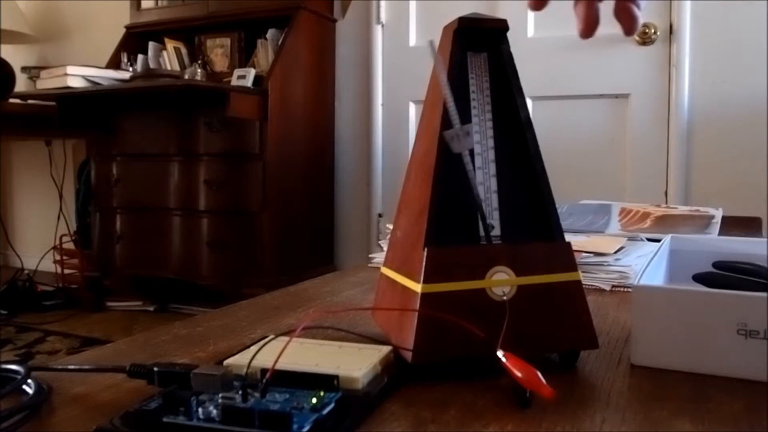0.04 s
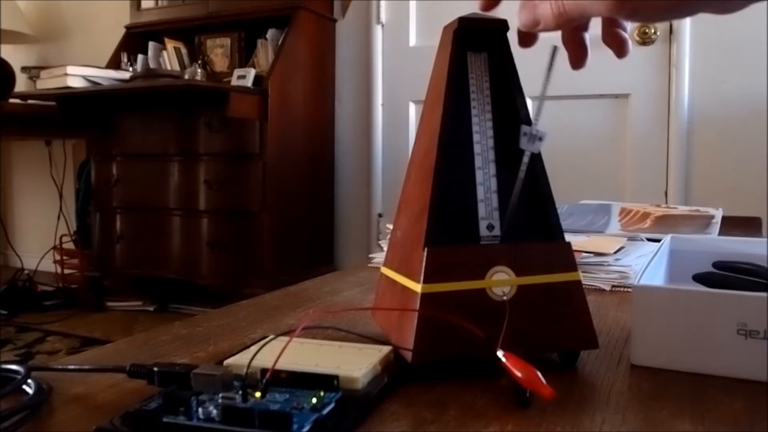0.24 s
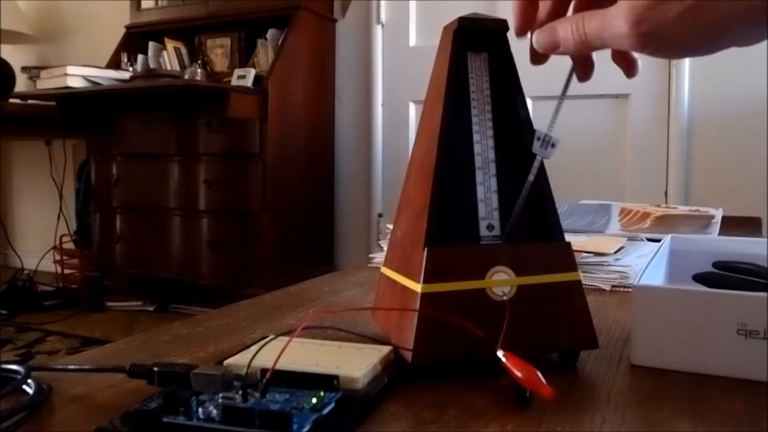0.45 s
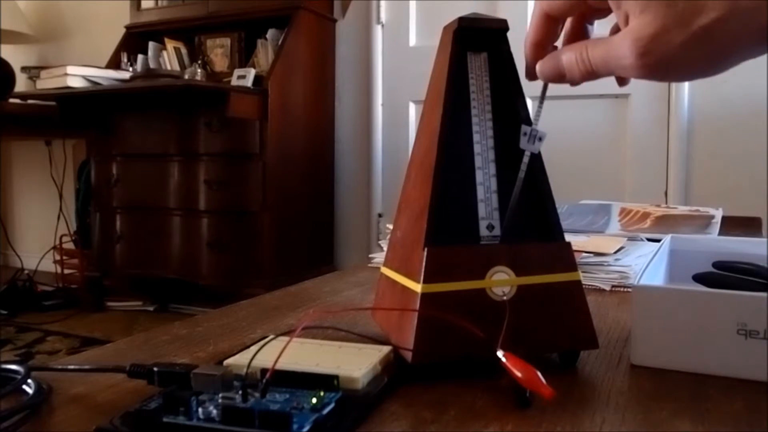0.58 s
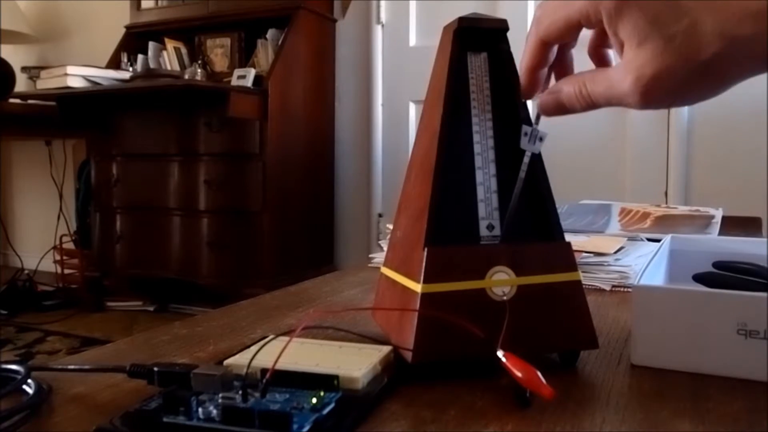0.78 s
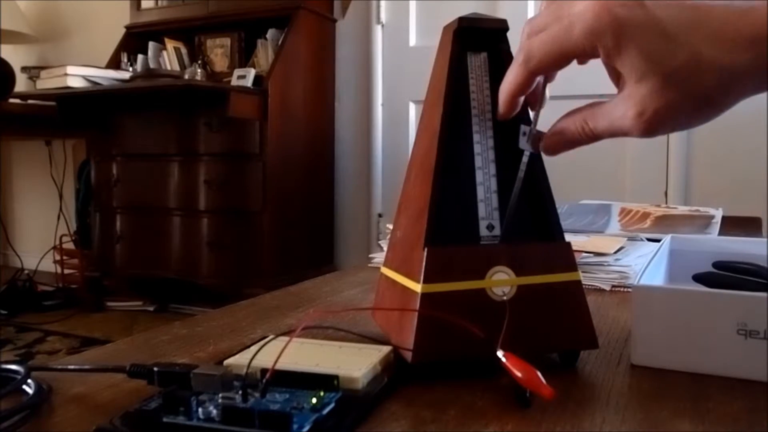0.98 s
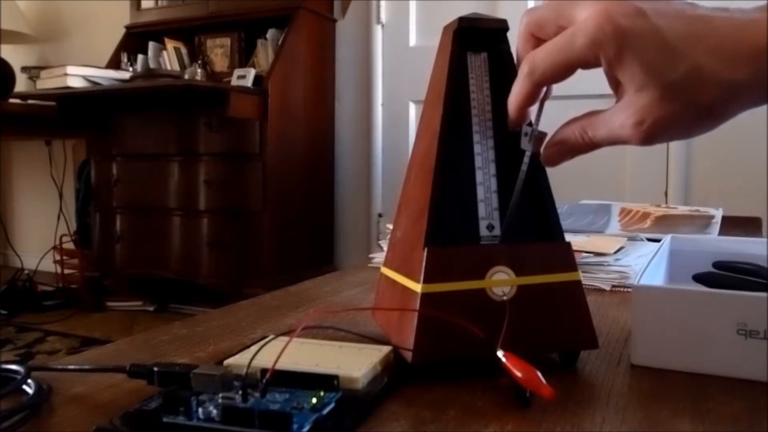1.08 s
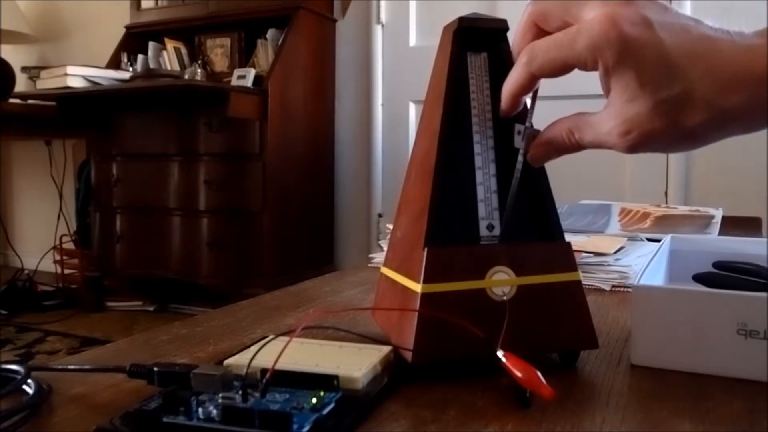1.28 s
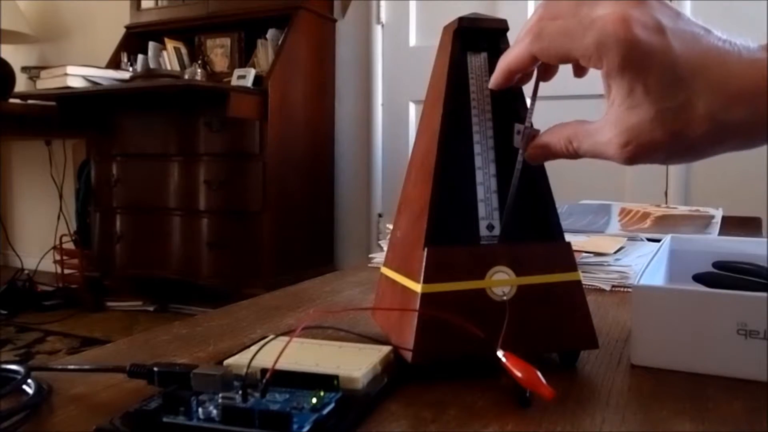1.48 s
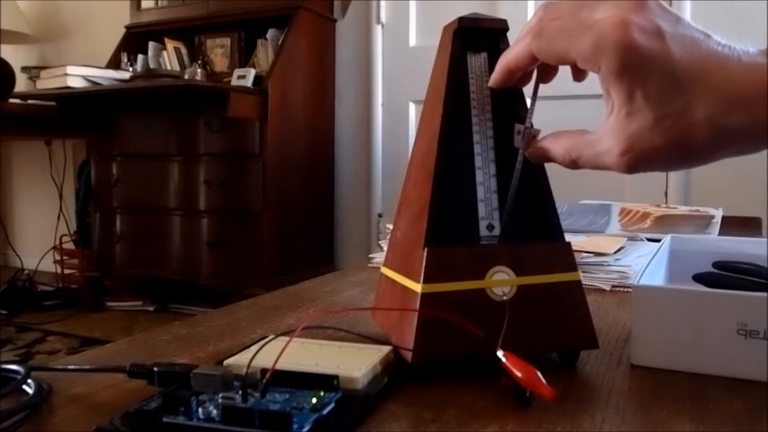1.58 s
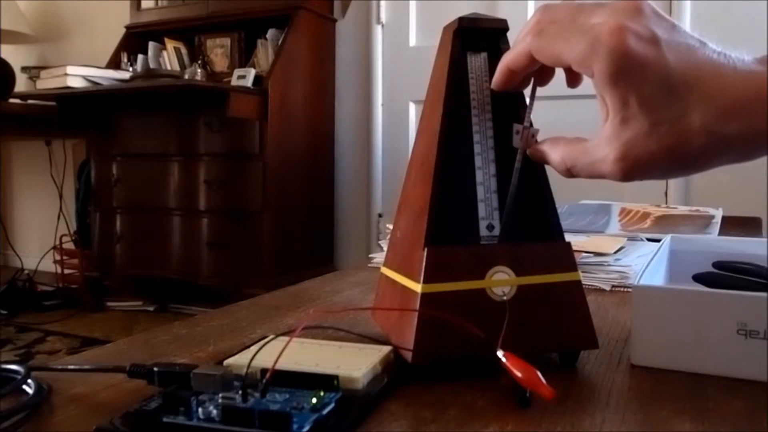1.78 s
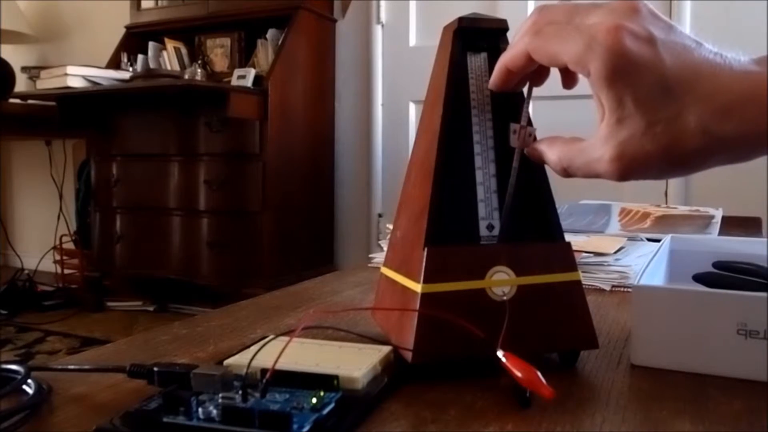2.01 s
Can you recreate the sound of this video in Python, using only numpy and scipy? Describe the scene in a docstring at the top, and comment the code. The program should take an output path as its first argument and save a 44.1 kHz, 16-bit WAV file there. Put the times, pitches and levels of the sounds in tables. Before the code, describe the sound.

A mechanical metronome ticks once, then faint clicks as fingers catch and adjust its pendulum.

```python
"""A small furnished room, one microphone close to a wooden clockwork metronome on a desk.
It ticks once: the escapement knocks the case and sets the steel works ringing. A hand then catches
the pendulum, grips its weight and slides it along the rod, clicking over the notches.
A fan and the mains hum quietly behind, with a soft rush of air and a low rumble."""
import sys
import numpy as np
from scipy import signal
from scipy.fft import rfft, irfft
from scipy.io import wavfile
from scipy.ndimage import uniform_filter1d

SR = 44100
rng = np.random.default_rng(int(sys.argv[2]) if len(sys.argv) > 2 else 0)


def store_wav(level_fs):
    """Save 16-bit WAV to argv[1]."""
    pcm = np.round(np.clip(np.atleast_2d(level_fs), -1, 1) * 32767)
    wavfile.write(sys.argv[1], SR, pcm.T.astype(np.int16))


N = 90404

# Modes of the wooden case, the steel works and the pendulum's weight.
# Each row: frequency in Hz, relative level in dB, time to fall 60 dB (T60) in seconds.
CASE_MODES = [(282, -34, .138), (522, -29, .062), (722, -19, .047), (890, -17, .02), (1125, -11, .015),
              (1812, -17.5, .026), (2590, -15.5, .018), (2826, -23, .032), (3164, -18, .032),
              (3867, -19.5, .026), (4228, -14.5, .033), (4808, -21, .032), (5624, -19, .019),
              (6448, -23, .024), (6858, -25, .026), (8563, -26, .028)]
WORKS_MODES = [(1098, -36, .33), (2144, -40, .3), (3612, -46, .38), (3688, -41, .27), (4173, -39, .3),
               (4221, -38, .3), (4328, -43, .36), (4470, -41, .3), (4543, -40, .3), (4624, -39, .34),
               (4683, -46, .46), (4714, -46, .46), (4791, -49, .46), (5063, -46, .3), (6627, -52, .4),
               (6751, -46, .32), (7192, -50, .26), (10960, -57, .3)]
WEIGHT_MODES = [(1240, -11, .03), (1930, -8, .22), (2200, -8, .05), (2720, 0, .05), (3220, -5, .035)]
# Colours of the noises. Each row: frequency in Hz, relative spectral density in dB.
CRACK_COLOUR = [(200, -18), (900, 1), (4500, 8.5), (7500, -0.5), (8600, -3), (9400, -9.5), (10600, -2),
                (12100, -15.5), (13600, 0.5), (15200, -10), (15900, -12)]
ROOM_COLOUR = [(90, -49), (150, -20), (210, -3.5), (285, 6.5), (376, -45), (480, 10), (612, -25), (720, -4),
               (830, -10), (1120, 0), (1380, -11.5), (2050, -5), (2330, -12.5), (2810, -8.5), (3290, -12),
               (3600, -4.5), (3950, -13), (4250, -7), (4750, -2.5), (5360, -19), (6700, -7), (7700, -18),
               (8550, -13), (9200, -26), (10800, -18), (11900, -28), (14000, -18), (15800, -14)]
RUMBLE_COLOUR = [(30, -20), (60, -17), (82, 6), (100, -7.5), (120, 10), (145, -9), (220, -41)]
AIR_COLOUR = [(25, -38), (50, -33), (110, -22.5), (150, -16), (206, -7), (236, -13), (275, -11), (354, -11),
              (384, -10), (463, -11.5), (503, -13), (607, -17.5), (818, -21), (1370, -24), (1610, -26.5),
              (1740, -24.5), (2220, -28), (2910, -30.5), (4500, -31), (5300, -35.5), (6700, -33.5),
              (8300, -37), (9300, -45), (11000, -43), (12200, -50.5), (14000, -38), (16000, -32.5)]
THUD_COLOUR = [(40, -38), (75, -22), (130, -24), (280, 8), (400, 0.5), (560, 1.5), (700, -7.5),
               (950, -10.5), (2000, -40)]
TAP_COLOUR = [(500, 5), (1500, 1), (3000, 2.5), (6000, -8.5), (9000, -20), (12000, -25), (15000, -19)]
SCRAPE_COLOUR = [(600, -20), (1400, -3), (2000, 2.5), (2750, -1), (3300, -3), (4300, -16), (7000, -15),
                 (9000, -29), (13000, -37)]
SLIDE_COLOUR = [(1000, 4), (2500, -1.5), (4200, -1), (6500, -1), (8500, -16), (15000, -12)]
# The room's reverberation time. Each row: band centre in Hz, T60 in seconds.
ROOM_DECAY = [(200, 0.29), (700, 0.44), (2000, 0.48), (4600, 0.5), (7000, .37), (10000, 0.33),
              (15000, 0.18)]
# Rise and fall of the rumble. Each row: time in seconds, rms level in dB.
RUMBLE_LEVELS = [(0, -59.5), (.2, -58.5), (.52, -73.5), (.85, -61.5), (1.13, -55.5), (1.35, -75.5),
                 (1.65, -63.5), (1.85, -54), (2.05, -59)]
# Tones of mains, fan and electronics. Each row: frequency in Hz, rms level in dB.
HUM_TONES = [(119.5, -69.5), (205, -69.5), (281, -64), (469, -53), (506, -74.5), (1735, -75),
             (15482, -72.5)]
# Fingers on the pendulum. Each row: start in seconds, click in dB, thud in dB, tilt in dB per octave.
FINGER_TAPS = [(0.596, -41, -41.5, 4.5), (0.6194, -52, -44, -14), (0.8444, -49.5, -63, -1),
               (0.8979, -50, -68, 1)]
# Notches in the rod. Each row: start in seconds, click in dB, thud in dB, ping in Hz, ping in dB.
NOTCH_CLICKS = [(1.0913, -49, -54, 10950, -56), (1.104, -46, -47.5, 6010, -58),
                (1.557, -47.5, -52, 6900, -47), (1.5862, -69, -51, 6900, -64)]


def undb(db):
    """Decibels to gain."""
    return 10 ** (np.asarray(db) / 20)


def curve(points, hz):
    """Read a table on a log-frequency axis."""
    freqs, values = np.array(points, float).T
    return np.interp(np.log(np.maximum(hz, 1)), np.log(freqs), values)


def noise(colour, tilt_db=0):
    """Noise of rms 1 with a given spectrum, tilted per octave."""
    hz = np.maximum(np.fft.rfftfreq(N, 1 / SR), 1)
    gain = undb(curve(colour, hz) + tilt_db * np.log2(hz))
    coloured = irfft(rfft(rng.standard_normal(N)) * gain, N)
    return coloured / coloured.std()


def since(start):
    """Seconds since a moment, zero before it."""
    return np.maximum(np.arange(N) / SR - start, 0)


def decay(start, t60):
    """Sudden onset, then a fall of 60 dB every t60 seconds."""
    t = since(start)
    return (t > 0) * np.exp(-np.log(1000) * t / t60)


def rise(start, tau_s):
    """A softened onset, climbing from 0 towards 1."""
    return 1 - np.exp(-since(start) / tau_s)


def ring(modes, start):
    """Struck modes; neighbours swing in opposite directions."""
    t = since(start)
    return sum((-1) ** (k + 1) * undb(db) * decay(start, t60) * np.sin(2 * np.pi * hz * t)
               for k, (hz, db, t60) in enumerate(modes))


def wander(rate_hz):
    """Smooth random wander with a spread near 1."""
    hold = int(SR / rate_hz)
    steps = np.repeat(rng.standard_normal(N // hold + 1), hold)
    return uniform_filter1d(uniform_filter1d(steps, hold), hold)[:N]


def tick(start):
    """The escapement strikes, close up: a crack, the knock of the case, ringing steel, then the room."""
    crack = undb(-18.5) * noise(CRACK_COLOUR) * decay(start, t60=.04)
    furniture_echo = undb(-14.5) * ring(CASE_MODES, start + .0155)
    low_cut = signal.butter(3, 210, "high", fs=SR, output="sos")  # the small box radiates little bass
    knock = signal.sosfilt(low_cut, ring(CASE_MODES, start) + furniture_echo)
    steel = undb(1.5) * ring(WORKS_MODES, start)
    return crack + knock + steel + reverberation(start + .0055)


def reverberation(start):
    """The room's diffuse tail, in which each band dies at its own pace."""
    spectrum, hz = rfft(noise(ROOM_COLOUR)), np.fft.rfftfreq(N, 1 / SR)
    tail = 0
    for centre, t60 in ROOM_DECAY:
        band = curve([(f, f == centre) for f, _ in ROOM_DECAY], hz)
        tail += irfft(spectrum * band, N) * decay(start, t60)
    return undb(-25.5) * tail * rise(start, tau_s=.0013)


def room_tone():
    """Behind the metronome: a rumble that comes and goes, soft air, and slightly wavering hum."""
    drift_hz, waver_db = .69, .23
    rumble_db = np.interp(since(0), *np.array(RUMBLE_LEVELS).T)
    rumble = undb(rumble_db) * noise(RUMBLE_COLOUR)
    air = undb(-52) * noise(AIR_COLOUR)
    hum = 0
    for hz, db in HUM_TONES:
        cycles = np.cumsum(hz + drift_hz * wander(5.87)) / SR + rng.random()
        hum += np.sqrt(2) * undb(db + waver_db * wander(4.14)) * np.sin(2 * np.pi * cycles)
    return rumble + air + hum


def touch(start, click, thud_db, t60):
    """A light contact: a short click with its room tail and a low thud through the case."""
    room_tail = undb(-11) * decay(start, t60=.3)
    envelope = np.hypot(decay(start, t60), room_tail)
    thud = undb(thud_db) * noise(THUD_COLOUR) * decay(start, t60=.18) * rise(start, tau_s=.00099)
    return click * envelope + thud


def finger_taps():
    """Fingers tap against the pendulum as they catch it."""
    return sum(touch(start, undb(db) * noise(TAP_COLOUR, tilt_db), thud_db, t60=.027)
               for start, db, thud_db, tilt_db in FINGER_TAPS)


def notch_click(start, db, thud_db, ping_hz, ping_db):
    """The weight drops into a notch: it rings briefly, scrapes, and its spring clip pings."""
    weight = undb(db) * ring(WEIGHT_MODES, start)
    ping = ring([(ping_hz, ping_db, .024)], start)
    scrape = touch(start, undb(db + 1.5) * noise(SCRAPE_COLOUR), thud_db, t60=.033)
    return (weight + ping + scrape) * rise(start, tau_s=.00037)


def weight_slide(start, length_s):
    """The weight rubs along the rod: a faint hiss that swells and fades."""
    progress = np.clip(since(start) / length_s, 0, 1)
    return undb(-60) * np.sin(np.pi * progress) * noise(SLIDE_COLOUR)


def scene():
    """Metronome, hand and room at one close microphone."""
    ticks = tick(start=-.25) + tick(start=.246)  # the first is heard only as a fading ring
    taps = finger_taps()
    notches = sum(notch_click(*row) for row in NOTCH_CLICKS)
    slide = weight_slide(start=1.09, length_s=.58)
    return (ticks + room_tone() + taps + notches + slide)[None]


def record(dry):
    """The recorder cuts the top steeply above 15.72 kHz."""
    return signal.sosfilt(signal.ellip(10, .2, 70, 15720, fs=SR, output="sos"), dry)


dry = scene()
out = record(dry)
store_wav(out)
```